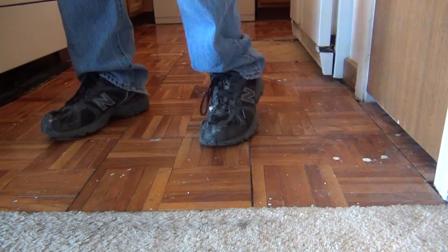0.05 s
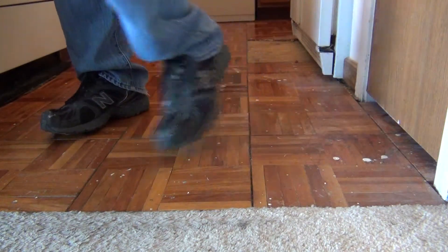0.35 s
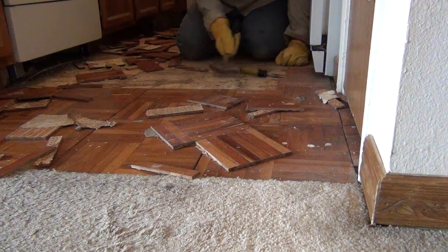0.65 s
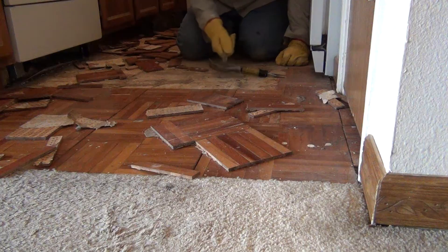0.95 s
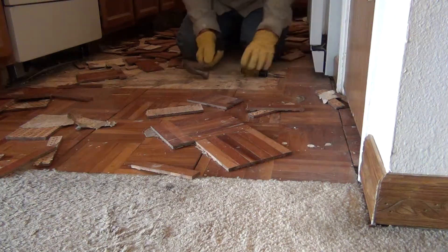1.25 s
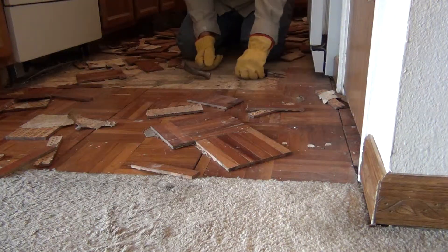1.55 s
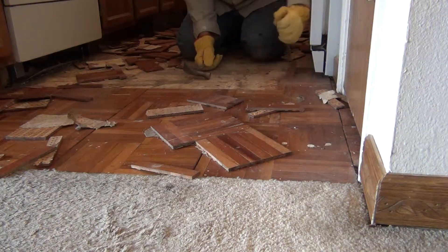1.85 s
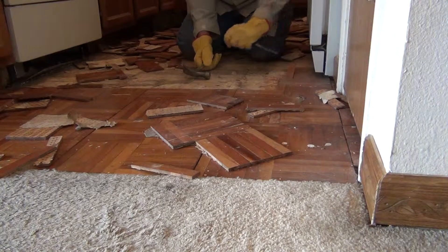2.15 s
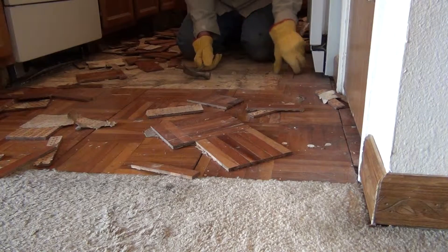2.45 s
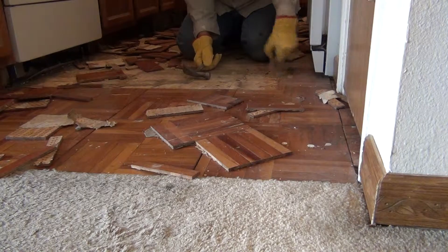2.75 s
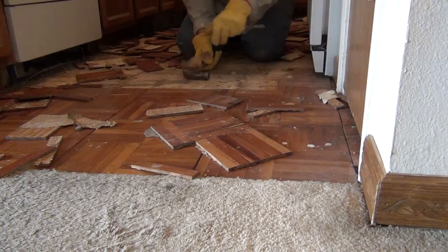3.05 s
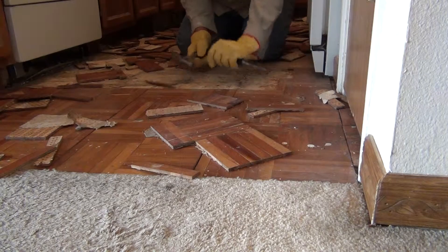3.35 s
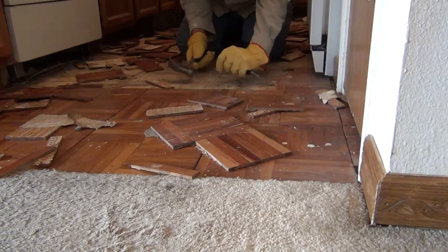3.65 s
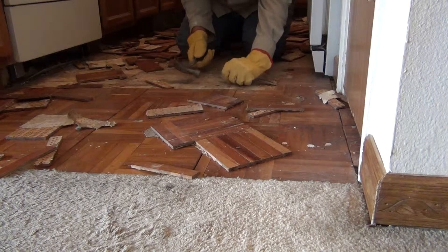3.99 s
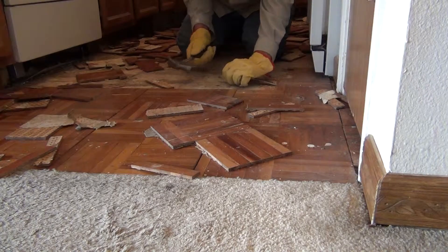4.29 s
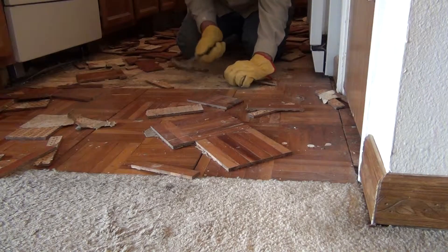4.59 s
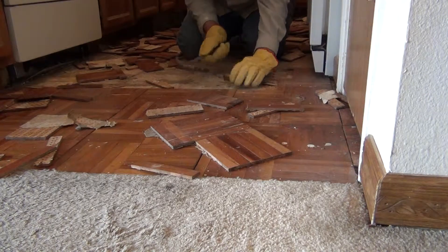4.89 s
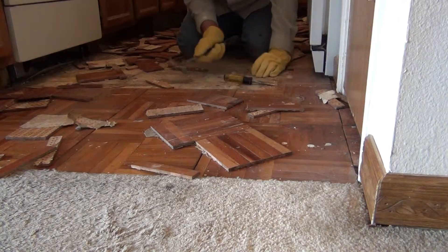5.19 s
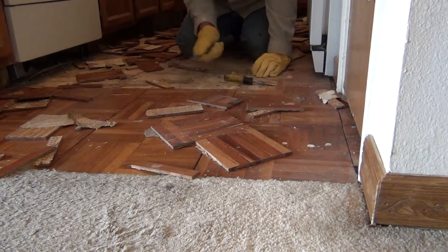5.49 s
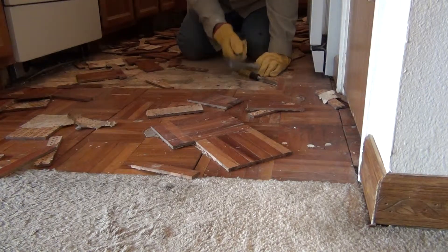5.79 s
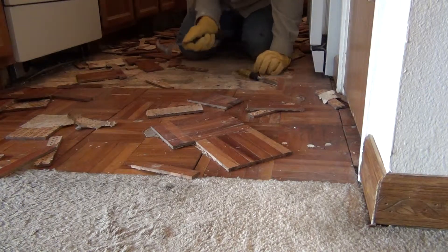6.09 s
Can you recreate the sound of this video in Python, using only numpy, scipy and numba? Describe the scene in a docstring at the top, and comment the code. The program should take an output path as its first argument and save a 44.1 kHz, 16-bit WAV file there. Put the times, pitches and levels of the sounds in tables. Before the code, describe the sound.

Sharp hammer blows on a steel chisel crack wooden floor tiles in a small room, with tools clinking and scraping between two runs.

```python
"""Breaking up a wooden floor

A worker breaks up glued wooden floor tiles in a small kitchen. Two runs of hard steel blows
crack the tiles and make the floor beneath boom. Between them, tools are laid down, clink and
scrape over grit. The bare room rings for half a second over a faint appliance hum,
and a limiter flattens the hard blows."""
import sys
import numpy as np
from scipy import signal
from scipy.fft import rfft, irfft, next_fast_len
from scipy.io import wavfile
from scipy.ndimage import uniform_filter1d, minimum_filter1d
from numba import njit

SR = 44100
rng = np.random.default_rng(int(sys.argv[2]) if len(sys.argv) > 2 else 0)


def store_pcm(level_fs):
    """Save levels as 16-bit WAV."""
    pcm = np.round(np.clip(level_fs, -1, 1) * 32767).astype(np.int16)
    wavfile.write(sys.argv[1], SR, np.atleast_2d(pcm).T)


N = 274743
TIME = np.arange(N) / SR
AGE = TIME[:int(0.8 * SR)]  # seconds since a hit

# hard blows: (time [s], force [dB], looseness of the tile [0-1], hollowness under it [dB])
BLOWS = [(0.7304, -1, 0.78, 3), (1.0470, -3, 0.57, 5), (4.61, -9, 0.13, 2), (4.895, -7, 0.13, 0),
         (5.1736, -3.5, 0.39, 4.5), (5.5001, 0, 0.08, -3), (5.8465, -2, 0.39, 12.5)]
# tone of a tile cracking under a blow: (frequency [Hz], level [dB])
BLOW_TONE = [(210, -3), (350, -6.5), (417, -5.5), (482, -9.5), (674, -8.5), (928, -8), (1180, 1),
             (1500, -12), (2420, -10), (4180, -14), (4900, -11.5), (8170, -21), (10200, -18), (14500, -28),
             (16000, -42)]
# Modes are the notes a struck thing rings with; ring time is how long one takes to fall by 60 dB.
# a wooden tile: (frequency [Hz], level [dB], ring time [s])
TILE_MODES = [(404, 2.5, 0.05), (568, -9, 0.21), (657, 15.5, 0.037), (900, -19, 0.05), (837, 15, 0.038),
              (1054, -22, 0.21), (1216, -3, 0.26), (1253, 0, 0.037), (1805, 25, 0.0078), (1900, -34, 0.057)]
# the brief ring of the steel tool: (frequency [Hz], level [dB], ring time [s])
STEEL_MODES = [(2800, -16, 0.015), (2673, -3.5, 0.016), (5080, -10.5, 0.018), (4895, 4.5, 0.015),
               (5440, -5, 0.0093), (5960, -1, 0.037), (6870, -18, 0.014), (8000, -6, 0.002),
               (10720, 7, 0.011)]
# the floor beneath the tiles, on its beams: (frequency [Hz], level [dB], ring time [s])
FLOOR_MODES = [(38.3, -26, 0.046), (80, -21, 0.08), (100.1, -30, 0.39), (145, -14.5, 0.13), (216, 1, 0.044),
               (197.4, -29, 0.72), (213.4, -13, 0.37), (221.8, -17.5, 0.54), (234.5, -33.5, 1),
               (286.6, -19.5, 0.5), (309.3, -21.5, 0.33), (372, -31.5, 0.67)]
# dull bumps of hands, knees and tool handles: (time [s], level [dB], clack relative to it [dB])
THUMPS = [(.445, -35.5, 0), (1.311, -10.5, 0.5), (1.775, -17.5, -2.5), (3.606, -13, -2), (3.636, -9.5, -3),
          (3.660, -8.5, -16.5), (3.942, -10, -9)]
# loose tiles knocked or dropped: (time [s], level [dB], crack relative to it [dB])
CLACKS = [(.003, -29.5, -0.5), (.6, -31, -1.5), (1.428, -32, 1), (1.753, -31, 14.5), (1.793, -33, 16.5),
          (1.884, -27.5, 4), (2.539, -19.5, 0), (2.832, -29.5, 4), (2.879, -29, -4), (3.404, -26, -6),
          (3.451, -23.5, -7.5), (3.499, -16, -4), (3.572, -20, -17)]
# a steel tip set down on grit: (time [s], level [dB], thud relative to it [dB])
TAPS = [(1.763, -19.5, -3), (1.978, -36.5, 9.5), (2.011, -34.5, -22), (2.733, -43, 5), (2.831, -32.5, -1),
        (2.898, -31.5, 3.5), (3.154, -32, 7), (3.404, -37.5, -5), (3.491, -33.5, 8)]
# tone of a knock in the wood, at a tile's edge and in the grit: (frequency [Hz], level [dB])
WOOD_TONE = [(130, -15), (250, 3.5), (380, 3), (650, -2.5), (850, -9), (1150, -20), (1700, -23),
             (4000, -47)]
EDGE_TONE = [(500, -7.5), (1100, 6.5), (2000, -0.5), (3100, 1.5), (4500, -6.5), (8000, -14.5)]
GRIT_TONE = [(2000, 3), (4500, 9), (8000, 5), (11000, 12), (13000, 6), (16000, -14)]
# hammer laid against a steel bar: (time [s], level [dB], brightness [dB/octave], bounce delay [s])
CLINKS = [(3.249, -11.5, -6.5, 0.0081), (3.314, -14.5, -3, 0.027), (3.5, -24.5, -10, 0.019)]
# the loose steel bar: (frequency [Hz], level [dB], ring time [s])
BAR_MODES = [(1192, -20.5, .32), (2140, -18, .02), (3050, -13, 0.11), (3173, 6, 0.022), (3570, -1, 0.018),
             (4030, -20, 0.019), (5890, -5.5, 0.024), (7250, -16, .012), (9800, -7.5, 0.007),
             (12000, -24, .008)]
# steel dragged over grit: (start [s], length [s], level [dB], tile sound relative to it [dB])
SCRAPES = [(0.427, 0.17, -62.5, 16.5), (1.535, 0.38, -41, -4), (1.719, .18, -30, 5.5),
           (2.66, 0.041, -35.5, -10), (2.772, 0.16, -38, -3), (3.981, 0.088, -38.5, -16),
           (4.212, 0.34, -37, -14.5), (5.973, 0.14, -39.5, -2.5)]
# how long the kitchen echoes: (frequency [Hz], ring time [s])
ROOM_RING = [(150, 0.4), (500, 0.52), (1200, 0.5246), (3000, .5), (6000, 0.5), (14000, 0.3)]
# tone of its echo: (frequency [Hz], level [dB])
ROOM_TONE = [(100, -7.5), (400, -1), (1200, -1), (4000, -5.5), (14000, -10.5)]
# tone of the room's steady air noise: (frequency [Hz], level [dB])
AIR_TONE = [(20, -50), (32, -42), (50, -32), (90, -16), (140, -10.5), (240, -8.5), (330, -18), (390, -8.5),
            (480, -20), (780, -17), (1000, -23), (1560, -23.5), (5900, -39.5), (16000, -41)]
# the notes of the appliance's hum: (frequency [Hz], peak level [dB])
HUM_NOTES = [(156, -53), (258, -44), (387, -51)]
# how much louder the left side is than the right: (frequency [Hz], difference [dB])
BALANCE = [(30, 7), (70, 4.2), (170, 2.4), (350, 2), (700, 1.5), (2800, 1.1), (5600, .7), (13000, -.8)]

# Pairs are (firmly glued, loose): a looser tile clacks louder, rattles longer and has less treble.
CLACK_DB, EDGE_DB, TREBLE_DB, STEEL_DB = (-3.1, 6), (2.6, 2), (10, 3.5), (-13, -2.5)
RATTLE_S = (0.018, 0.2)


def blows(floor_lag_s=0.00687, tile_db=-9, boom_db=-7.5):
    """Steel strikes with a short ring, a tile cracks and rattles, then the floor booms."""
    sharp, low = np.zeros((2, N)), np.zeros(N)
    for time, force_db, looseness, hollow_db in BLOWS:
        clack_db, edge_db, treble_db, steel_db = (
            np.interp(looseness, [0, 1], pair) for pair in (CLACK_DB, EDGE_DB, TREBLE_DB, STEEL_DB))
        rattle_s = np.exp(np.interp(looseness, [0, 1], np.log(RATTLE_S)))
        contact = as_hit(burst(0.026)) + as_hit(burst(rattle_s))
        crack = as_hit(shape_tone(contact, BLOW_TONE))
        crack = shape_tone(crack, [(150, -2.2), (400, hollow_db), (700, clack_db), (1200, clack_db),
                                   (1700, edge_db), (2700, edge_db), (4500, -0.95), (10000, treble_db)])
        tile_pitch = 1 + 0.012 * rng.standard_normal()  # every tile is a slightly different size
        tile = undb(tile_db + clack_db) * as_hit(ring(TILE_MODES, tile_pitch, scatter_db=2.5))
        steel_pitch = 1 + 0.024 * rng.standard_normal()
        steel = undb(steel_db) * as_hit(ring(STEEL_MODES, steel_pitch, scatter_db=2.7))
        add(sharp, time, undb(force_db) * in_room(crack + tile + steel, echo_db=3))
        add(low, time + floor_lag_s, undb(boom_db - 0.5 * hollow_db) * floor_boom())
    return sharp, low


def floor_boom(damping=1, rise_s=0.0035):
    """The floor takes a moment to start swinging; weight resting on it (damping) shortens its ring."""
    modes = [(hz, db, ring_s / damping) for hz, db, ring_s in FLOOR_MODES]
    swing = ring(modes, scatter_db=1.5) * (1 - np.exp(-(AGE / rise_s) ** 2))
    return np.sqrt(2) * swing / np.abs(swing).max()


def knocks():
    """Thumps go mostly into the floor, clacks into the wood, taps into the grit. Gives (sharp, low)."""
    out = np.zeros((2, N))
    for time, db, clack_db in THUMPS:
        add(out, time, one_knock(thud_db=db, wood_db=db + clack_db, crack_db=db + clack_db - 20.5))
    for time, db, edge_db in CLACKS:
        add(out, time, one_knock(thud_db=db - 11, wood_db=db, crack_db=db + edge_db))
    for time, db, relative_db in TAPS:
        thud_db = db + relative_db
        add(out, time, one_knock(thud_db, wood_db=thud_db - 8.5, crack_db=db - 7, tick_db=db))
    return out


def one_knock(thud_db, wood_db, crack_db, tick_db=-np.inf, soft_s=0.0018):
    """Wood clacks, its edge cracks and grit ticks (the sharp part); the floor thuds (the low part)."""
    push = 1 - np.exp(-AGE / soft_s)  # wood gives way more slowly than grit
    wood = undb(wood_db) * as_hit(shape_tone(burst(0.036) * push, WOOD_TONE))
    crack = undb(crack_db) * as_hit(shape_tone(burst(0.048), EDGE_TONE))
    tick = undb(tick_db) * as_hit(shape_tone(burst(0.02), GRIT_TONE))
    thud = undb(thud_db) * floor_boom(damping=1.9)
    return np.array([wood + crack + tick, thud])


def clinks(click_db=-1, bounce_loss_db_per_s=480, bounce_db_per_octave=13):
    """The hammer lands on the loose bar, which rings, then bounces once: weaker but brighter."""
    out = np.zeros(N)
    for start, force_db, brightness, delay_s in CLINKS:
        landing = (start, force_db, brightness)
        bounce_db = force_db - bounce_loss_db_per_s * delay_s
        bounce = (start + delay_s, bounce_db, brightness + bounce_db_per_octave)
        for time, db, tilt in (landing, bounce):
            metal = as_hit(ring(BAR_MODES, db_per_octave=tilt, scatter_db=3))
            chatter = as_hit(signal.fftconvolve(metal, burst(0.023))[:len(AGE)])
            click = as_hit(shape_tone(burst(0.008), [(500, 1.5), (3000, 8), (6000, -6), (15000, -8.5)]))
            add(out, time, undb(db) * (as_hit(metal + chatter) + undb(click_db) * click))
    return out


def scrapes(grain_db=4.6, largest_db=17, swell_share=0.46):
    """Grains of grit crunch under the steel, swelling and fading as each stroke speeds up and slows."""
    sizes = undb(np.minimum(grain_db * rng.exponential(size=N // 32 + 1), largest_db))
    grains = rng.standard_normal(N) * np.repeat(sizes, 32)[:N]  # each grain lasts 32 samples
    grit = as_steady(shape_tone(grains, GRIT_TONE))
    tile = as_steady(shape_tone(grains, EDGE_TONE))
    out = np.zeros(N)
    for start, length, db, tile_db in SCRAPES:
        speed = np.interp((TIME - start) / length, [0, swell_share, 1], [0, 1, 0])
        out += undb(db) * speed ** 1.38 * (grit + undb(tile_db) * tile)
    return out


def kitchen_echo(build_s=0.0091, early_s=0.12, early_db=4):
    """The room's answer to a click: single echoes thicken into a tail whose treble dies first."""
    build_up = 1 - np.exp(-(AGE / build_s) ** 2)
    spikes = np.repeat(rng.exponential(size=len(AGE) // 16 + 1), 16)[:len(AGE)] - 1
    early_echoes = undb(early_db * np.exp(-AGE / early_s) * spikes)
    spectrum = rfft(rng.standard_normal((2, len(AGE))) * early_echoes * build_up)
    octave = np.log2(np.maximum(np.fft.rfftfreq(len(AGE), 1 / SR), 1))
    tail = 0
    for hz in 62.5 * 2 ** np.arange(0, 8.6, 0.5):  # half-octave bands, each fading at its own pace
        share = np.clip(1 - 2 * np.abs(octave - np.log2(hz)), 0, 1)
        band = irfft(spectrum * share, len(AGE)) * fade(look_up(ROOM_RING, hz))
        even_out = np.sqrt(np.mean(share ** 2) / np.sum(band ** 2, axis=1, keepdims=True))
        tail = tail + undb(look_up(ROOM_TONE, hz)) * band * even_out
    return stereo(*tail, width=0.38)


def in_room(sound, echo_db):
    """The direct sound plus its echoes; every spot on the floor has its own echo pattern."""
    echoes = signal.fftconvolve(sound[None], kitchen_echo(), axes=1)[:, :len(sound)]
    return sound + undb(echo_db) * echoes


def air_and_hum(air_db=-43):
    """Steady room air and the slightly wavering hum of an appliance."""
    middle, side = (as_steady(shape_tone(rng.standard_normal(N), AIR_TONE)) for _ in range(2))
    waver_times = np.linspace(0, TIME[-1], 50)
    hum = np.zeros(N)
    for hz, db in HUM_NOTES:
        waver = np.interp(TIME, waver_times, rng.standard_normal(len(waver_times)))
        hum += undb(db) * np.sin(2 * np.pi * hz * TIME + waver)
    return undb(air_db) * stereo(middle, side, width=0.25) + hum


def ring(modes, pitch=1, db_per_octave=0, scatter_db=0):
    """A struck thing rings with fading notes; where it is hit changes how loud each one is."""
    offsets_db = scatter_db * rng.standard_normal(len(modes))
    out = 0
    for (hz, db, ring_s), offset_db in zip(modes, offsets_db):
        gain = undb(db + offset_db + db_per_octave * np.log2(hz / modes[0][0]))
        out = out + gain * fade(ring_s) * np.sin(2 * np.pi * hz * pitch * AGE)
    return out


def burst(ring_s):
    """A dying cluster of tiny contacts, evened out so that it has no pitch of its own."""
    cluster = rng.standard_normal(len(AGE)) * fade(ring_s)
    spectrum = rfft(cluster, next_fast_len(len(AGE)))
    return irfft(spectrum / np.abs(spectrum))[:len(AGE)] * fade(4 * ring_s)


def fade(ring_s):
    """A smooth fall of 60 dB in ring_s seconds."""
    return np.exp(-np.log(1000) * AGE / ring_s)


def shape_tone(sound, tone, size=4096):
    """Filter a sound by a table of (frequency [Hz], level [dB])."""
    gains = undb(look_up(tone, np.fft.rfftfreq(size, 1 / SR)))
    cepstrum = irfft(np.log(gains))
    # fold the second half onto the first, so the filter never rings before a hit
    cepstrum[1:size // 2] *= 2
    cepstrum[size // 2 + 1:] = 0
    response = irfft(np.exp(rfft(cepstrum)))
    return signal.fftconvolve(sound, response)[:len(sound)]


def look_up(table, hz):
    """Read between the rows of a (frequency [Hz], value) table, with octaves evenly spaced."""
    frequencies, values = np.transpose(table)
    return np.interp(np.log(np.maximum(hz, 1)), np.log(frequencies), values)


def undb(db):
    """Turn decibels into a number to multiply by."""
    return 10 ** (np.asarray(db) / 20)


def as_steady(sound):
    """Scale a long sound to an average (rms) level of 1."""
    return sound / np.sqrt(np.mean(sound ** 2))


def as_hit(sound):
    """Scale a short sound to the energy of 5 ms at level 1."""
    return sound / np.sqrt(np.sum(sound ** 2) / (0.005 * SR))


def add(track, time, sound):
    """Mix a sound into a track at a time in seconds."""
    start = max(int(time * SR), 0)
    track[..., start:start + sound.shape[-1]] += sound[..., :N - start]


def stereo(middle, side, width):
    """Left and right hear nearly the same sound; width sets how much they differ."""
    return np.array([middle + width * side, middle - width * side])


@njit
def follow_peaks(sizes, release):
    """Track a sound's peaks, rising at once and falling slowly."""
    out, peak = np.empty(len(sizes)), 0.
    for i in range(len(sizes)):
        peak = max(sizes[i], peak + (sizes[i] - peak) * release)
        out[i] = peak
    return out


def scene():
    """Blows, knocks, clinks and scrapes on one floor in one room."""
    blow, blow_boom = blows()
    knock, knock_boom = knocks()
    floor = blow_boom + knock_boom
    # the wide floor sounds from all round, so left and right are slightly out of step
    shifted = np.imag(signal.hilbert(floor, next_fast_len(N)))[:N]
    floor = in_room(floor, echo_db=-8) + stereo(0, shifted, width=0.097)
    return (blow + floor + in_room(knock, echo_db=2) + in_room(clinks(), echo_db=-5.5)
            + air_and_hum() + in_room(scrapes(), echo_db=1))


def record(dry, top_hz=16000, ceiling_db=-3, release_s=0.013):
    """The left side gets more bass, the highest treble is cut, and a fast limiter holds blows down."""
    treble_cut = signal.ellip(10, 0.2, 80, top_hz, fs=SR, output="sos")
    sides = [shape_tone(channel, [(hz, sign * db / 2) for hz, db in BALANCE])
             for channel, sign in zip(dry, (1, -1))]
    sound = signal.sosfilt(treble_cut, sides)
    peak = follow_peaks(np.abs(sound).max(axis=0), 1 - np.exp(-1 / (release_s * SR)))
    gain = np.minimum(1, undb(ceiling_db) / (peak + 1e-9))
    gain = uniform_filter1d(minimum_filter1d(gain, size=64), size=48)  # ease down just before a peak
    return signal.sosfiltfilt(treble_cut, sound * gain)


dry = scene()
out = record(dry)
store_pcm(out)
```